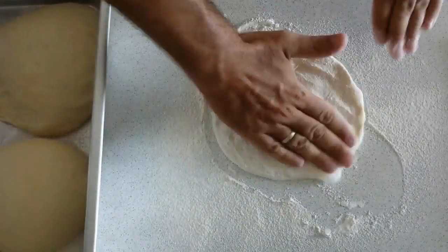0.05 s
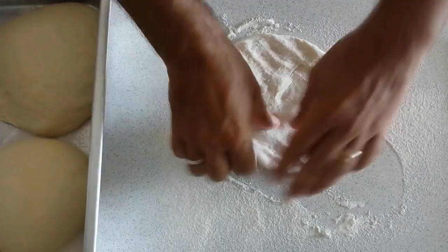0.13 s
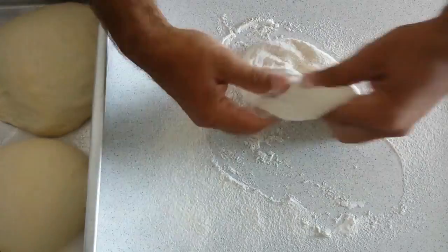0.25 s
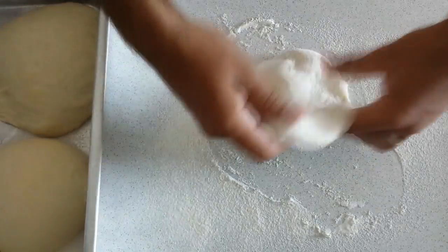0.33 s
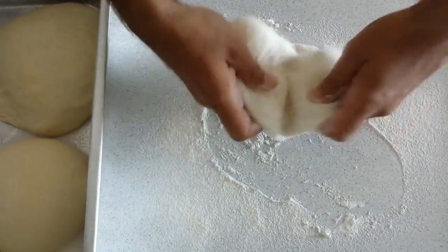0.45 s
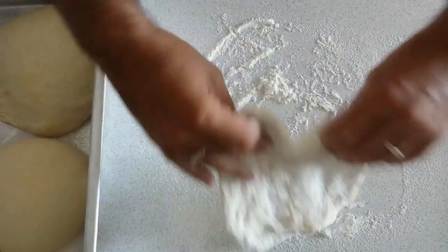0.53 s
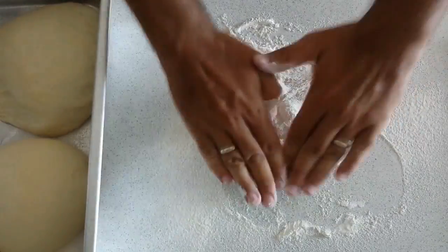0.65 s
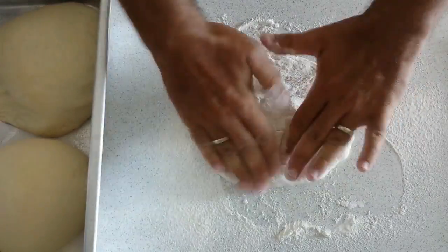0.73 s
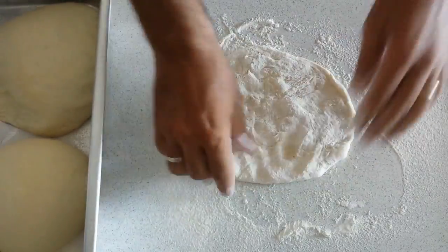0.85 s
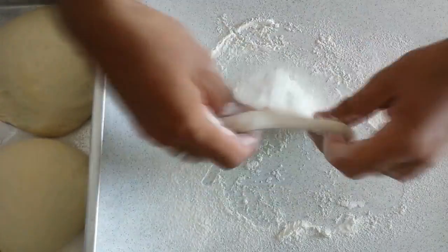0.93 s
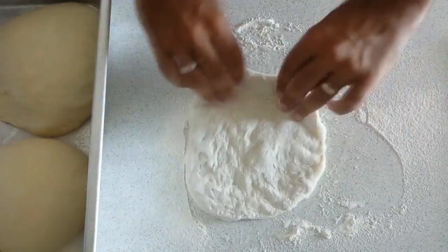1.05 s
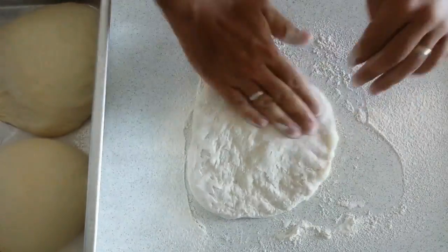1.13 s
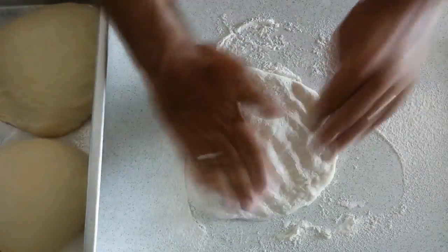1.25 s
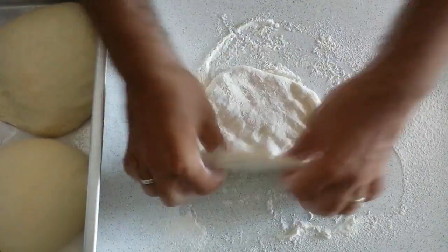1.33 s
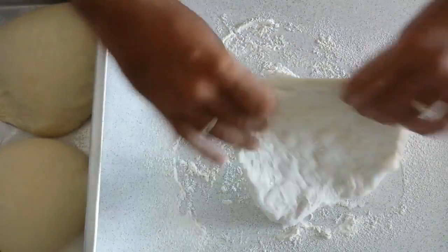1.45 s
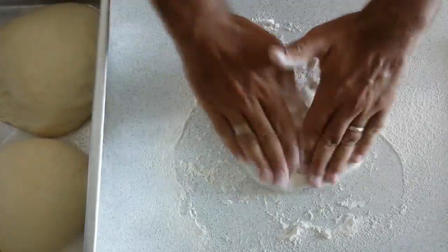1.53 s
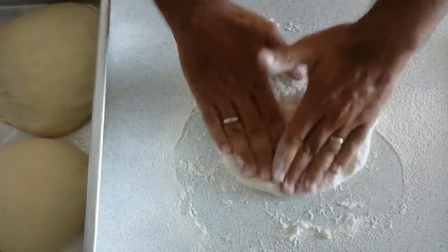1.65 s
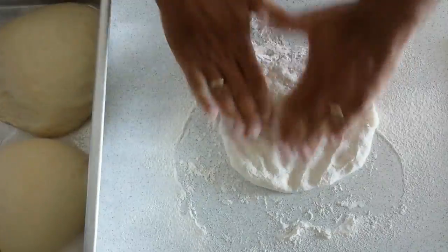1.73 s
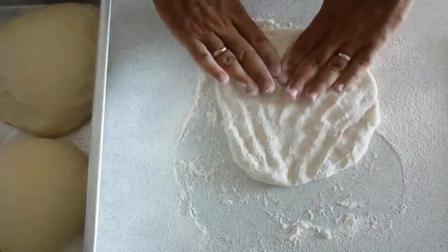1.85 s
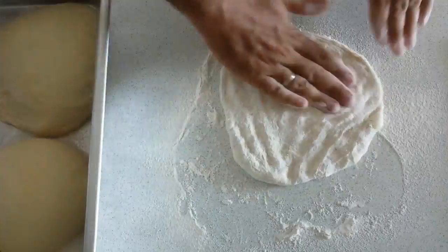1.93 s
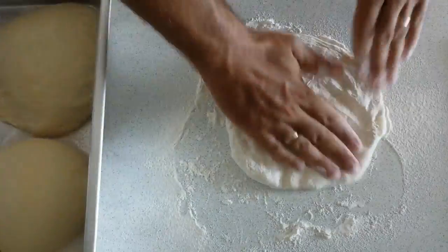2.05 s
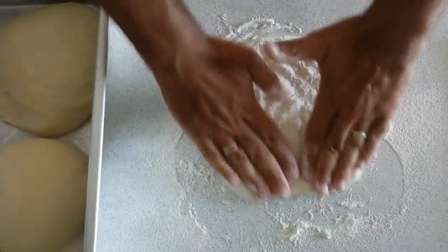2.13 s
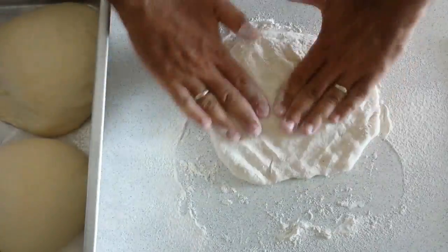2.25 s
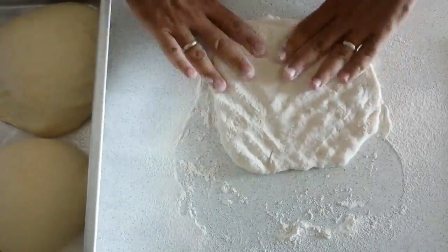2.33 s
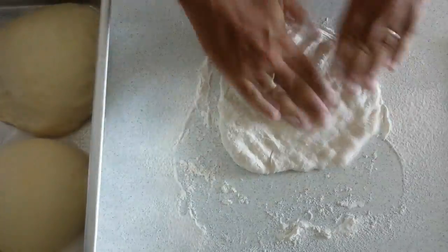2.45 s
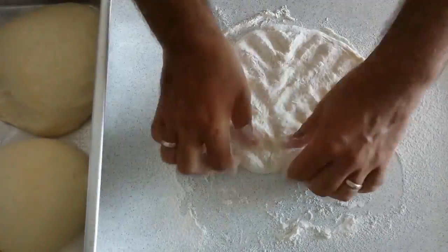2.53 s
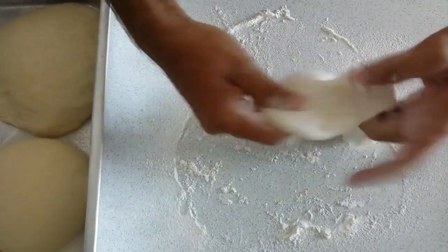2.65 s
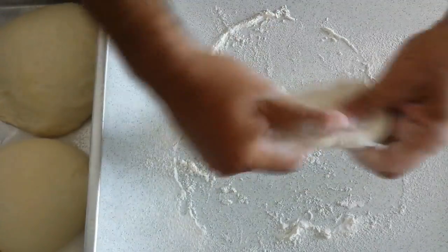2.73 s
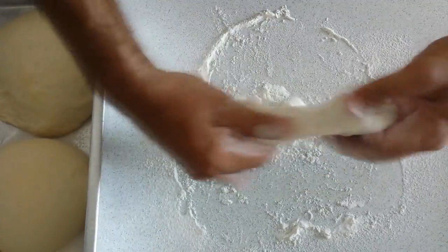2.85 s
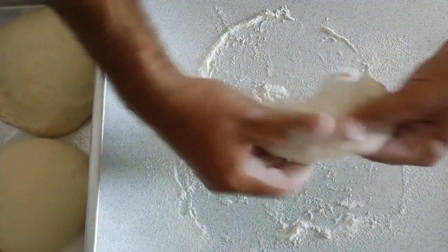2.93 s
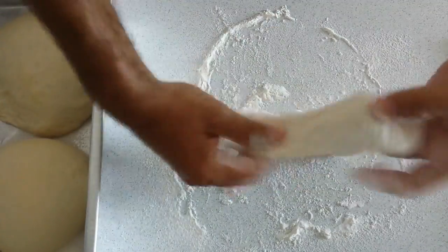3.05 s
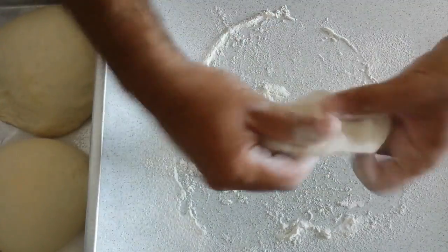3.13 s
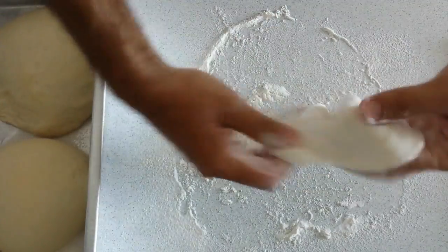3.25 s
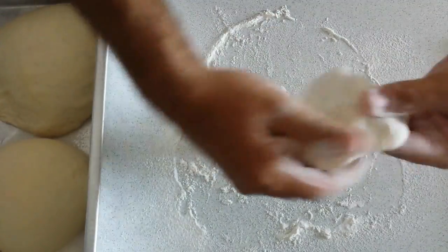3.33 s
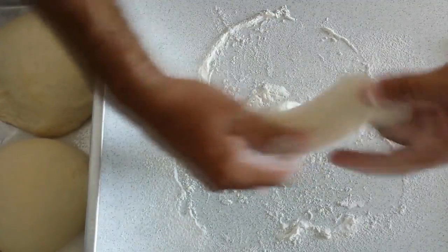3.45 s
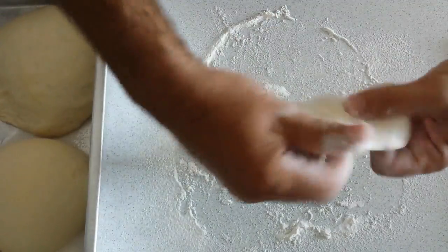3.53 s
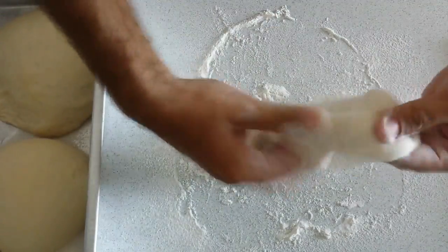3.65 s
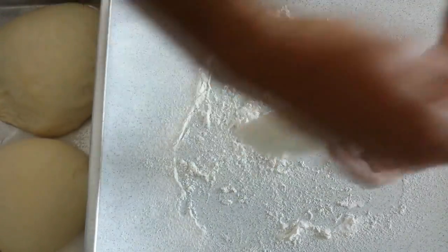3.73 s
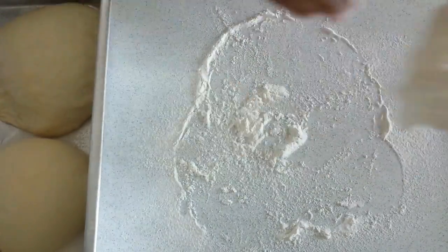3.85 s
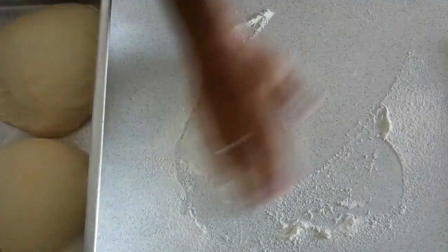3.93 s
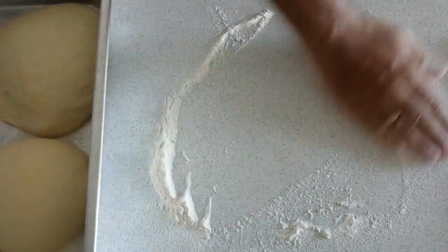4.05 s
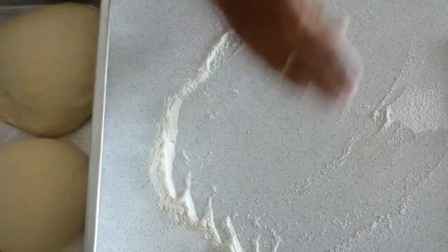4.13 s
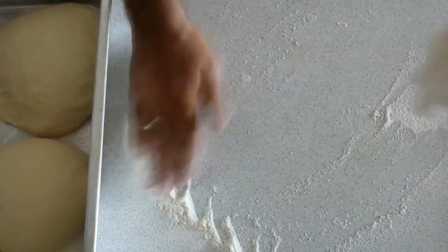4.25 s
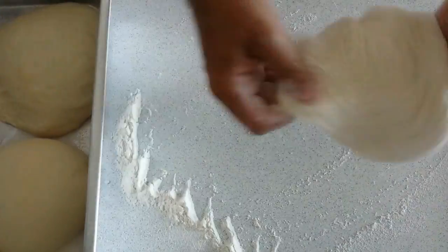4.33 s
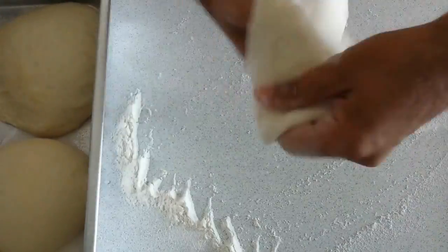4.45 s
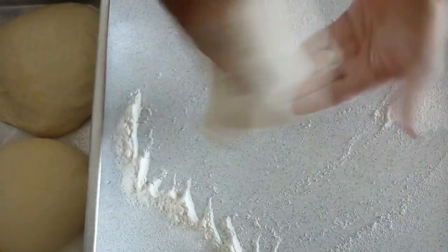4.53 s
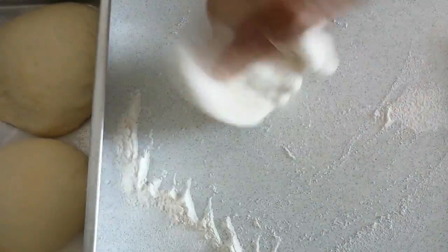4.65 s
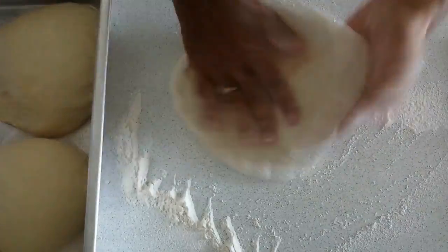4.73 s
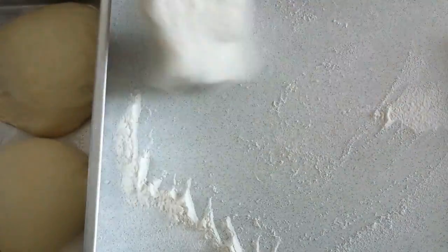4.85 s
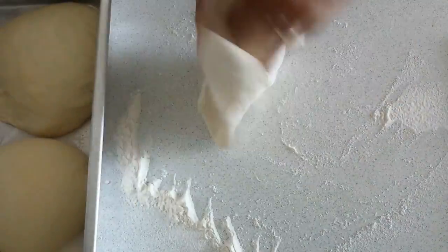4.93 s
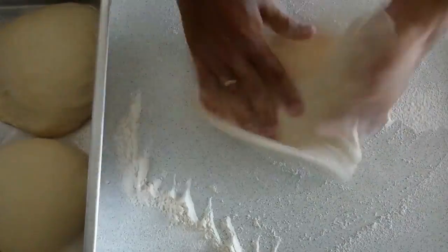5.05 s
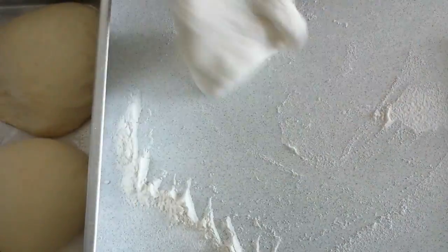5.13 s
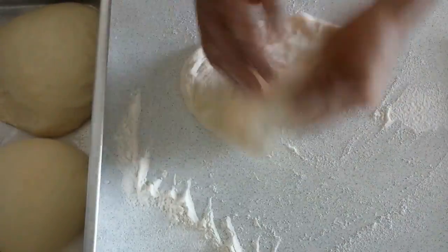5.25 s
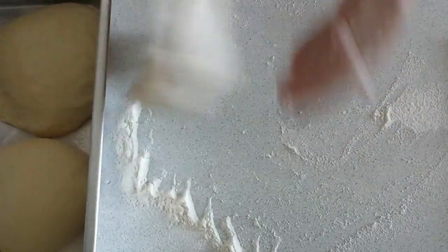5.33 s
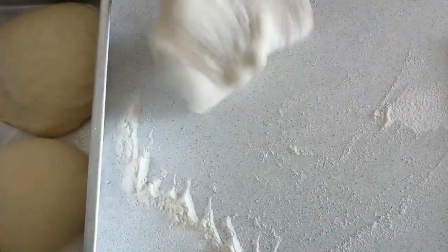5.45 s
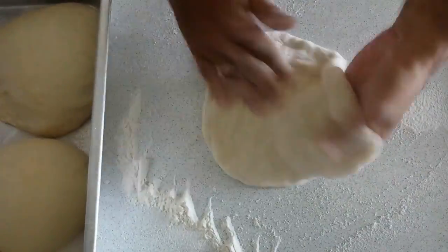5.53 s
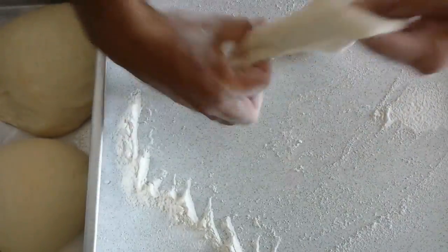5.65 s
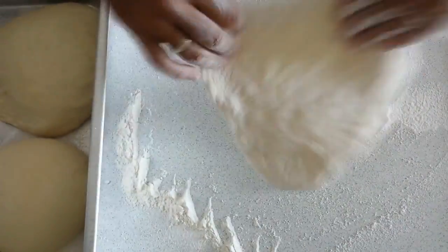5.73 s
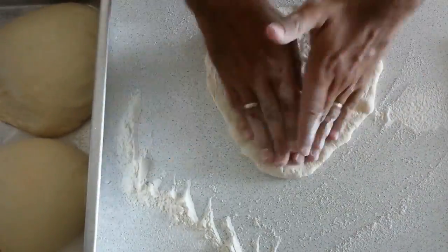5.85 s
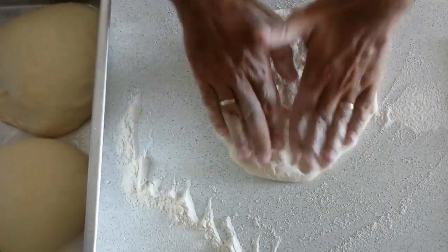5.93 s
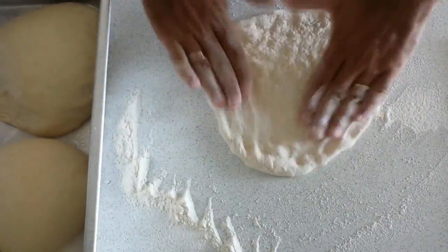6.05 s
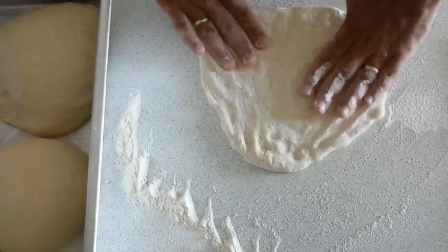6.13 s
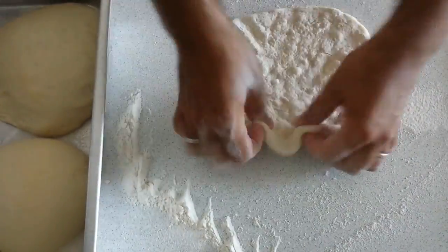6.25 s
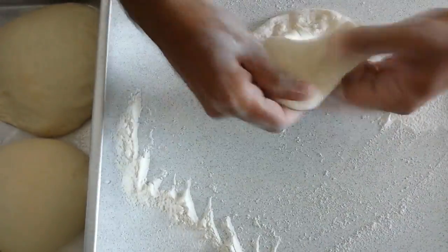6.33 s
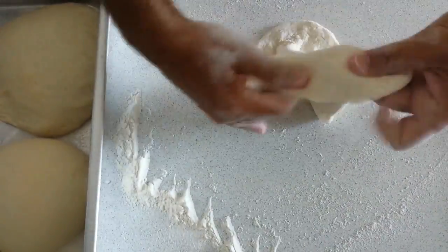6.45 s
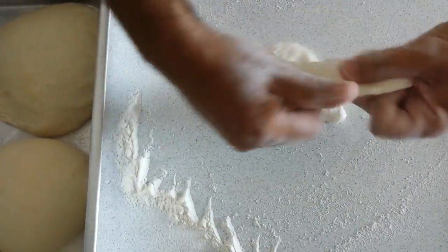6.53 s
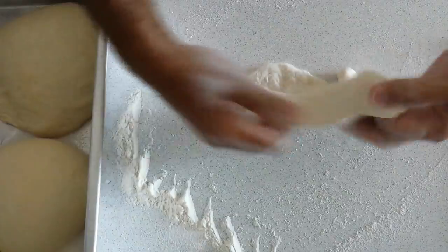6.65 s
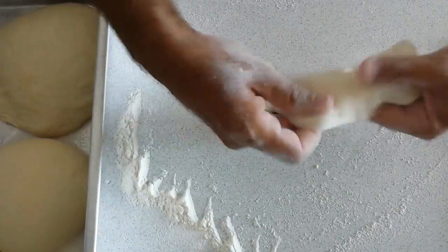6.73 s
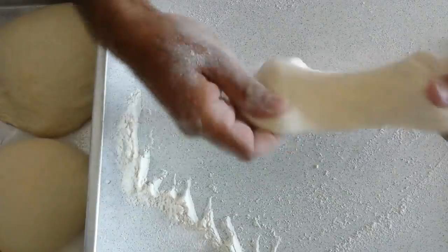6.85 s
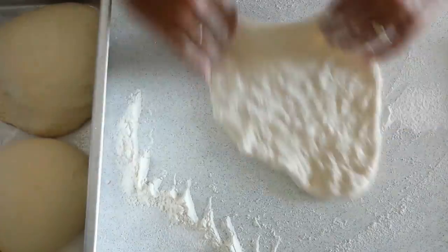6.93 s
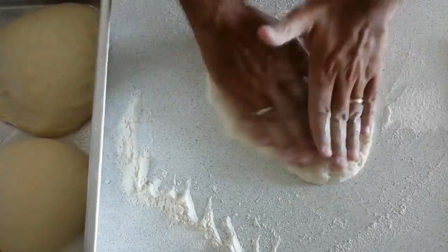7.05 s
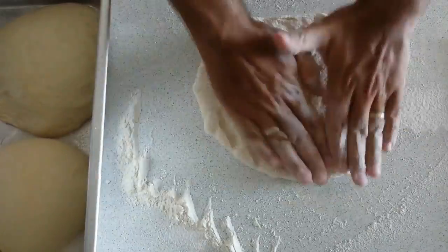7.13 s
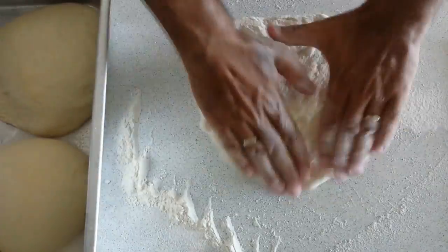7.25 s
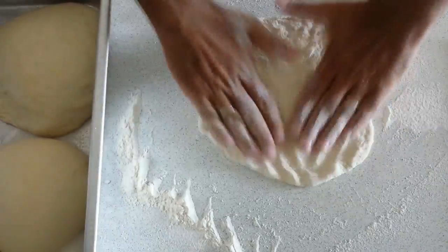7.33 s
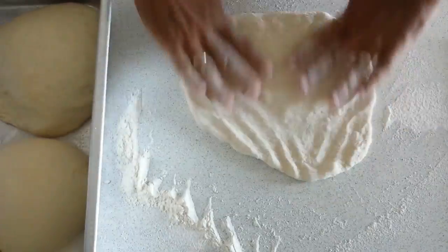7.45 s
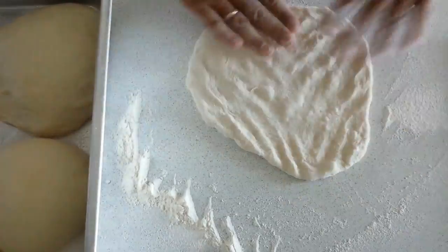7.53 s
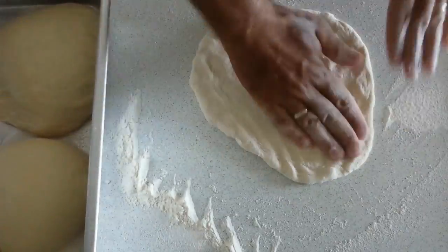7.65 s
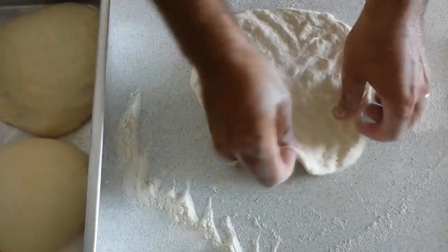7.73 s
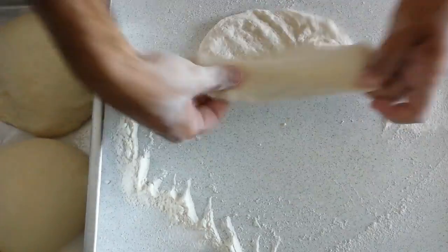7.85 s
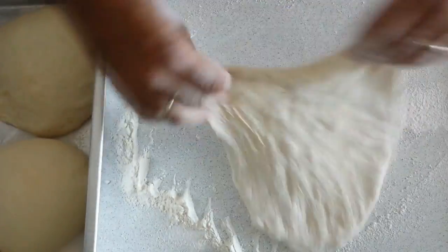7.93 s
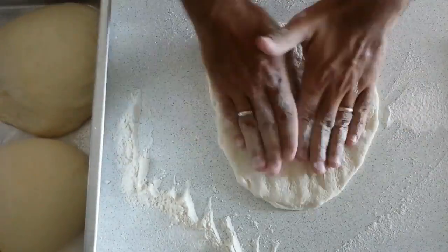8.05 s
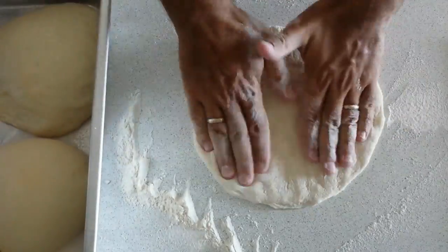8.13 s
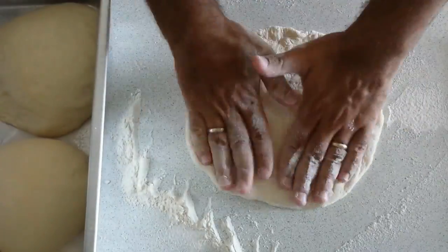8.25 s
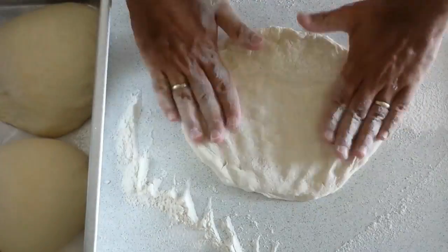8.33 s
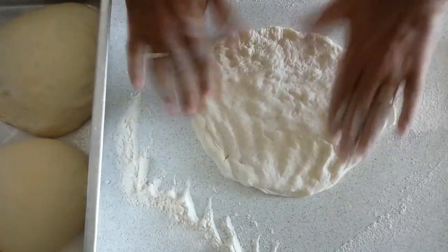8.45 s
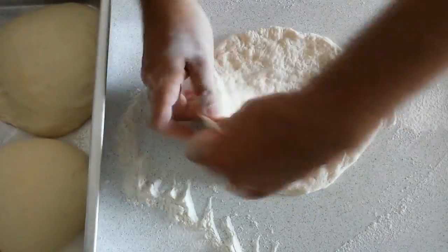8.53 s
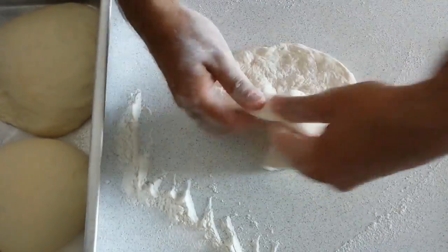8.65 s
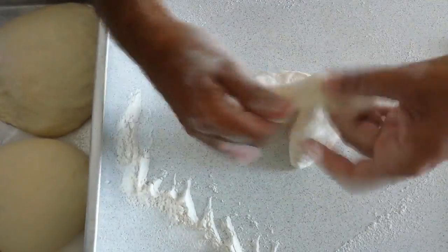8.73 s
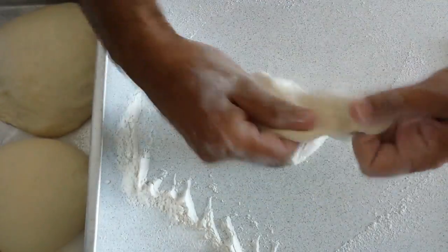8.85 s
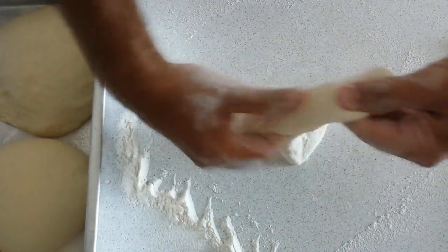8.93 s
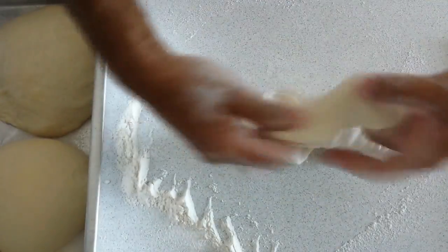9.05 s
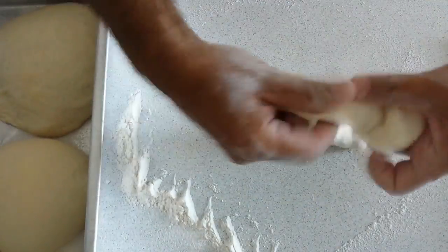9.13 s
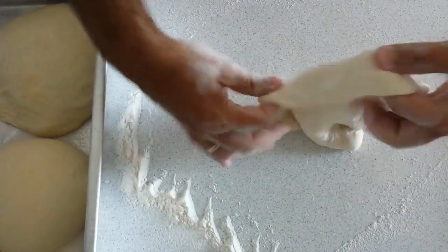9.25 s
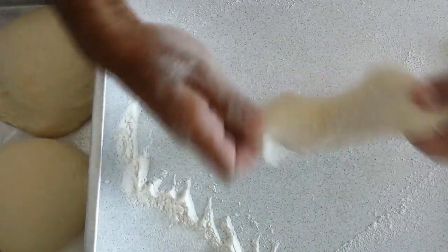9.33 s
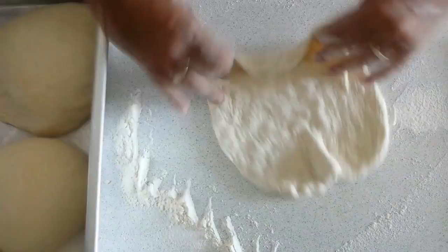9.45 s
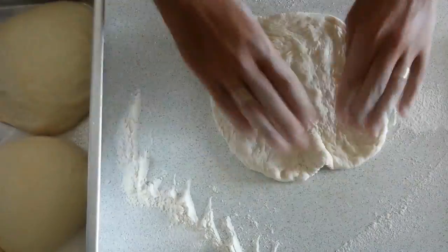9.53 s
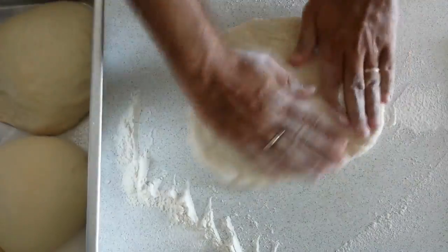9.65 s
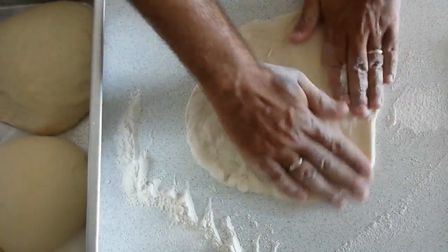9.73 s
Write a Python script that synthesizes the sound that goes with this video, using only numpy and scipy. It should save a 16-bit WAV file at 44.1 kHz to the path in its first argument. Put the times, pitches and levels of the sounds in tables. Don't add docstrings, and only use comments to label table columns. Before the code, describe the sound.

Close stereo sound of hands shaping dough on a floured worktop. Quiet pats, gritty brushing and low knocks come first, then soft rhythmic pinching. The dough is slapped down repeatedly, loud and fleshy with trapped air popping. Afterwards come pinches, a cluster of heavy presses, light rubbing and a last smack, over low counter rumble and steady faint room hiss.

```python
import sys
import numpy as np
from scipy import signal
from scipy.fft import rfft, irfft, next_fast_len
from scipy.io import wavfile
from scipy.ndimage import uniform_filter1d, map_coordinates

SR = 44100
rng = np.random.default_rng(int(sys.argv[2]) if len(sys.argv) > 2 else 0)


def store_pcm(level_fs):
    pcm = np.round(np.clip(level_fs, -1, 1) * 32767).astype(np.int16)
    wavfile.write(sys.argv[1], SR, np.atleast_2d(pcm).T)


def how_loud(loudness_db):
    steps = np.asarray(loudness_db, float) / 20
    return 10 ** steps


N = 431738


def unit(x):
    return x / np.sqrt(np.mean(x ** 2) + 1e-20)


def along(points, hz):
    f, v = np.transpose(points)
    return np.interp(np.log(hz + 1), np.log(f + 1), v)


def over_time(points):
    return np.interp(np.arange(N) / SR, *np.transpose(points))


def wobble(rate):
    knots = rng.standard_normal(int(N * rate / SR) + 4)
    return map_coordinates(knots, [np.arange(N) * rate / SR])


def filtered(x, response):
    m = next_fast_len(N + 8192)
    return irfft(rfft(x, m) * response(np.fft.rfftfreq(m, 1 / SR)), m)[..., :N]


# peak in seconds, level in dB, fall in ms, body in dB.
SMACKS = [(0.319, -52, 4.2, 1), (0.739, -49.5, 8.3, -17), (0.9, -55, 2.1, 4), (1.176, -55, 12, -1.5),
          (2.553, -65.5, 3.5, 16.5), (4.068, -47.5, 6, 4), (4.113, -46, 7.1, 13), (4.124, -40, 1.7, 12),
          (4.45, -70, 2.7, 13), (4.744, -40, 1.8, 8.5), (4.756, -39.5, 3.8, 10), (4.874, -45, 6.6, 6.5),
          (4.919, -33.5, 4.3, 7.5), (5.059, -31, 5.9, 4.5), (5.221, -27.5, 5.1, 7), (5.381, -34, 7.5, 7),
          (5.537, -26, 5.7, 8.5), (5.704, -31, 4.3, 3.5), (5.926, -33, 4.3, 3), (6.395, -49.5, 6.7, 5.5),
          (6.421, -50.5, 3.9, 6.5), (7.1, -39.5, 3.5, 8.5), (7.674, -46, 1.5, 3.5), (7.779, -50, 8.6, 2.5),
          (7.913, -58.5, 3, 11), (9.608, -32.5, 1.6, 11), (9.617, -39.5, 5.1, 1), (9.701, -61, 2.5, 7.5)]
# peak in seconds, level in dB, fall in ms, body in dB.
PATS = [(0.052, -54.5, 4.2, -15), (0.224, -56, 6.2, -11), (1.045, -54.5, 4.5, -1), (1.106, -56, 4.7, -9),
        (1.369, -56.5, 4.7, -3), (1.422, -50, 1.8, -3), (1.559, -52, 2.7, -14), (1.819, -49.5, 1.7, -13),
        (1.911, -54.5, 17, -31), (1.974, -55.5, 18, -3), (2.137, -54.5, 4, -9), (2.612, -56, 3, -1),
        (2.79, -55, 27, -10), (2.934, -54, 2.5, -3), (6.19, -50.5, 3.3, -26), (6.23, -52.5, 3.9, -57),
        (6.285, -53.5, 6.6, 4), (7.563, -47, 11, -19), (7.618, -42.5, 5.3, -17), (7.808, -50, 4.8, -2),
        (8.393, -54.5, 4.4, -15), (8.474, -51, 3.3, -22), (8.492, -49.5, 21, -4.5),
        (8.543, -49.7, 19, -2.5), (8.784, -50.5, 15, -26), (0.565, -58, 8, -10), (8.691, -59, 4, 8),
        (8.885, -52.5, 13, -12), (9.45, -52, 8, -14), (7.345, -56, 6.7, -13)]
# start in seconds, length in ms, level in dB, body in dB.
WIPES = [(1.632, 14, -55.5, -22), (2.387, 13, -50, -8), (2.44, 24, -56, -25), (2.49, 9.2, -57, -30),
         (4.081, 43, -42, 1), (4.236, 27.3, -44.5, -6.5), (4.38, 28, -43.5, -14), (4.49, 27, -56, -1),
         (4.645, 35, -50.5, -12), (4.815, 28, -53.5, -2), (5.6, 17, -51, 4), (7.115, 25, -49.5, -4.5),
         (7.222, 27, -54.5, -4.5), (7.507, 12, -51, -7), (7.72, 15, -58.5, 3), (8.034, 31, -55, -22),
         (8.124, 16.6, -48.5, -2.5), (8.96, 15, -52.5, -14), (9.63, 24, -52, -1.5), (9.747, 14, -50.5, -7)]
# start in seconds, peak in dB.
BRUSHES = [(0.1494, -51), (0.2628, -53), (0.386, -51), (0.6994, -49), (0.8494, -51), (1.3992, -47),
           (1.4794, -49), (1.5094, -48), (1.7185, -52), (1.8412, -49), (2.0278, -49), (2.158, -47),
           (2.1994, -50), (2.2994, -48), (2.3361, -50), (2.5885, -47), (2.6374, -49), (3.1594, -46),
           (3.2939, -44), (3.4594, -46), (3.8147, -45), (3.9494, -45), (4.4483, -52), (4.6349, -39),
           (4.8015, -41), (4.9821, -38), (5.1544, -41), (5.7694, -43), (6.0392, -46), (6.1144, -48),
           (6.1564, -45), (6.5544, -44), (6.7645, -44), (7.4544, -48), (7.6994, -45), (8.2494, -51),
           (8.306, -53), (8.4287, -48), (9.0444, -47), (9.2244, -44), (9.3332, -40), (9.4694, -49)]
# first and last pinch in seconds, middle level in dB.
RUNS = [
    (3.002, 3.4, -46.5),
    (3.525, 3.672, -49.5),
    (6.604, 6.932, -45),
    (9.124, 9.408, -47.5),
]


def touches():
    rows = [(s, db, 2.4 + 0.47 * fall, 0, fall, body) for s, db, fall, body in SMACKS]
    rows += [(s, db, 4.6, 0, fall, body) for s, db, fall, body in PATS]
    rows += [(s, db, 3.9 + 0.35 * hold, hold, 5, body) for s, hold, db, body in WIPES]
    rows += [(s + .005, db - 9.5, 5, 0, 5, -8) for s, db in BRUSHES]
    pinch_gap_s, ends_db, scatter_db = .067, -1, .5
    for first, last, db in RUNS:
        place = np.linspace(-1, 1, round((last - first) / pinch_gap_s) + 1)
        levels = db + ends_db * place ** 2 + scatter_db * rng.standard_normal(len(place))
        times = first + (last - first) * (place + 1) / 2
        rows += [(s, level, 8.5, 0, 6.1, -12.5) for s, level in zip(times, levels)]
    return rows


def contacts():
    power = np.zeros((3, N + 2 * SR))
    t = np.arange(-SR // 14, SR // 7) / SR
    linger = np.array([[1], [1.5], [.9]])
    for s, db, rise_ms, hold_ms, fall_ms, body_db in touches():
        air_db = -7 - 0.23 * body_db
        before = np.minimum(t, 0)
        after = np.maximum(t - hold_ms / 1000, 0)
        swell = how_loud(-6 * (before * 1000 / max(rise_ms, .3)) ** 2)
        lead_in = how_loud(-45.0 + 60 * before / 0.15)
        fall = how_loud(-6 * after * 1000 / (linger * max(fall_ms, 1)))
        tail = how_loud(-23.5 - 60 * after / (0.044 * linger)) * (t > 0)
        level = how_loud(db + np.array([[0], [body_db - 0.4], [air_db]]))
        start = SR + round((s + t[0]) * SR)
        power[:, start:start + len(t)] += (level * (swell + lead_in) * (fall + tail)) ** 2
    return power[:, SR:SR + N]


# time in seconds, level in dB.
WEIGHT = [(0, -60.5), (0.33, -53), (0.52, -58), (1.36, -49.5), (1.88, -53.5), (2.4, -49.5), (3.4, -57),
          (3.98, -55), (4.44, -54.5), (5.7, -40), (5.94, -37), (6.08, -41), (6.54, -52), (6.92, -47),
          (7.06, -58), (7.33, -53.5), (8.59, -54), (9.79, -54.5)]


def weight():
    return over_time(WEIGHT)


# time in seconds, level in dB.
RUB = [(0, -64), (0.8, -65.5), (1.92, -62), (2.72, -62), (2.79, -57), (3.97, -57.5), (4.03, -69),
       (4.44, -61.5), (4.95, -51.5), (5.73, -53), (6, -58.5), (6.4, -60.5), (6.62, -51), (7.04, -60),
       (8.65, -63.5), (8.78, -58), (9.36, -58), (9.79, -59.5)]
# middle in seconds, half-length in ms, level change
# in dB.
LIFTS = [(0.81, 29, -8), (0.98, 50, -9), (1.26, 80, -3.5), (1.69, 330, -1), (4.19, 35, 3), (4.315, 21, -7),
         (4.72, 54, -6), (5.35, 51, -8), (5.66, 23, -7), (7.04, 54, -6), (3.56, 44, -4.5), (7.18, 81, -6),
         (7.86, 20, -3.5), (8, 40, -7), (8.65, 21, -8), (9.56, 41, -8.5), (9.71, 53, -11), (2.955, 15, -5),
         (3.851, 25, -4), (4.79, 15, -6), (5.189, 25, -5), (5.985, 35, -4), (8.103, 15, -5)]
# frequency in Hz, level in dB per Hz.
FLOUR = [(650, -32), (1100, -12.5), (1680, 2), (1870, 1.5), (2790, 0.5), (3550, 3), (4260, 0.5),
         (5110, 3.5), (8000, -10), (10400, -22), (17600, -120)]
# frequency in Hz, level in dB per Hz.
DOUGH = [(200, -18), (320, -4), (390, -3), (530, -11), (800, -5), (1900, -12.5), (2700, -18), (4200, -25),
         (7000, -120)]
# frequency in Hz, level in dB per Hz.
AIR = [(3530, -46), (6000, -6.5), (6440, -2), (7680, -4), (15300, -6.5)]


def hands(drift):
    now = np.arange(N) / SR
    weight_db = weight()
    fidget = 1.4 * np.maximum(wobble(36), -.9)
    lifted = sum(db * np.maximum(1 - abs(now - s) * 1000 / ms, 0) for s, ms, db in LIFTS)
    rub_db = over_time(RUB) + lifted
    body_db = -60.5 + 0.42 * (weight_db - weight_db.mean())
    body_db += 0.61 * (rub_db - rub_db.mean())
    grit = unit(how_loud(1.9 * wobble(500)))
    rub, body, air = contacts()
    rub = np.sqrt(rub + how_loud(rub_db + fidget - 0.5) ** 2)
    body = np.sqrt(body + how_loud(body_db + fidget) ** 2)
    air = np.sqrt(air + how_loud(rub_db + fidget - 2.5) ** 2)
    return grit * (rub * rush(FLOUR, drift) + body * rush(DOUGH, drift) + air * rush(AIR, drift))


# start in seconds, level in dB, counter pitch in Hz, knock in dB.
PRESSES = [(0.232, -40.5, 129, -21), (1.043, -42.5, 135, -6), (1.253, -48.5, 121, 0),
           (1.367, -27.5, 136, -14.5), (1.419, -38, 131, -21), (1.496, -33, 149, -7.5),
           (1.629, -39.5, 137, -16), (1.813, -42.5, 139, -5), (2.045, -40.5, 148, -5),
           (2.102, -34.5, 134, -6), (2.358, -48, 118, -13), (2.448, -35.5, 136, -13),
           (2.551, -41, 142, -0.5), (2.607, -31.5, 122, -7), (2.703, -37, 141, -7), (5.988, -47, 148, -17),
           (6.096, -41, 160, -61), (6.282, -39, 144, -40), (6.379, -36, 148, -5), (6.662, -48, 154, -9),
           (6.863, -41.5, 140, 5.5), (7.446, -34, 137, -10), (7.574, -41.5, 120, -3),
           (7.675, -34, 131, -13), (7.72, -22, 122, -11), (7.776, -18, 153, -29), (7.803, -26, 128, -13),
           (7.899, -44.5, 148, 3), (8.502, -25.5, 123, -13), (8.541, -33, 129, -13)]
# start in seconds, level in dB, counter pitch in Hz, knock in dB,
# left lead in radians.
LANDINGS = [(0.308, -46, 149, -2, 1.7), (0.897, -36, 121, -12, 1.9), (4.743, -34, 125, -4, 2.9),
            (4.879, -37, 160, 3, .2), (4.916, -24, 130, -16, 3), (5.056, -16, 133, -9, -1.3),
            (5.217, -26, 150, -2, 1.7), (5.378, -19, 123, -4, -2.6), (5.539, -14.5, 131, -9, -.4),
            (5.701, -25, 137, -8, 2.5), (5.924, -30, 123, -12, .8), (7.094, -33, 133, -18, 2.8),
            (9.606, -20, 132, -16, 1.6)]
# frequency in Hz, level in dB, 60 dB decay in seconds.
KNOCK = [(241, 5, 0.072), (385, 9.5, 0.037), (698, 6, 0.016), (860, 5, 0.021)]


def thumps():
    out, t = np.zeros((2, N + SR)), np.arange(SR // 8) / SR
    luck = rng.standard_normal((len(PRESSES + LANDINGS), 2 * len(KNOCK) + 4))
    for (s, db, hz, knock_db, *known), draw in zip(PRESSES + LANDINGS, luck):
        lead = known[0] if known else np.sign(draw[-3]) * (1.22 + 0.46 * draw[-4])
        turn = np.array([[lead / 2], [-lead / 2]])
        damping = -60 * t / 0.066 - 60 * (t / 0.3) ** 2
        ring = how_loud(10.5 + damping) * np.sin(2 * np.pi * hz * t + turn)
        sway_hz = 72 * (1 + .18 * np.tanh(draw[-2]))
        sway_level = how_loud(-4.5 + 1.2 * draw[-1] - 60 * t / 0.067)
        ring += sway_level * np.sin(2 * np.pi * sway_hz * t + turn)
        ring *= 1 - np.exp(-t / 0.0025)
        for (mode_hz, mode_db, t60), size, detune in zip(KNOCK, draw, draw[len(KNOCK):]):
            phase = 2 * np.pi * mode_hz * (1 + 0.062 * detune) * t + (2 + size) * turn
            level = how_loud(knock_db + mode_db + 0.5 + 0.37 * size - 60 * t / t60)
            ring += level * np.sin(phase) * (1 - np.exp(-t / 0.0064))
        out[:, round(s * SR):][:, :len(t)] += how_loud(db) * ring
    return out[:, :N]


# time in seconds, peak in dB, pitch in Hz.
SLAPS = [(0.316, -40, 371), (0.317, -38, 721), (0.731, -44, 759), (0.733, -50, 2094), (0.734, -45, 5345),
         (0.899, -43, 780), (0.899, -49, 1157), (1.174, -36, 387), (1.173, -48, 877), (1.814, -47, 1916),
         (1.816, -44, 5227), (4.071, -33, 366), (4.069, -33, 1485), (4.078, -33, 2164), (4.119, -32, 392),
         (4.118, -27, 748), (4.113, -24, 1900), (4.113, -29, 2223), (4.742, -23, 306), (4.743, -28, 990),
         (4.743, -30, 1415), (4.754, -20, 392), (4.752, -25, 823), (4.753, -29, 1065), (4.883, -25, 296),
         (4.887, -36, 915), (4.92, -19, 387), (4.919, -21, 985), (4.922, -27, 1518), (4.914, -28, 2164),
         (5.058, -20, 371), (5.06, -21, 834), (5.058, -23, 1286), (5.065, -29, 1943), (5.229, -17, 382),
         (5.221, -15, 850), (5.219, -16, 1776), (5.217, -23, 3224), (5.22, -25, 5044), (5.379, -25, 613),
         (5.383, -20, 812), (5.376, -28, 1281), (5.377, -27, 1862), (5.54, -14, 392), (5.541, -15, 1092),
         (5.54, -15, 1388), (5.539, -12, 1695), (5.539, -16, 1964), (5.701, -23, 382), (5.704, -26, 1313),
         (5.928, -28, 328), (5.923, -22, 968), (5.923, -25, 2400), (7.097, -32, 538), (7.096, -32, 1545),
         (7.102, -35, 2051), (9.607, -24, 925), (9.607, -22, 1458), (9.607, -30, 1932), (9.606, -19, 2643)]


def slaps():
    out, t = np.zeros((2, N + SR)), np.arange(SR // 14) / SR
    rise_s = .001
    for (s, db, hz), turn in zip(SLAPS, rng.uniform(0, 1, (len(SLAPS), 4))):
        t60_s = .036 * (400 / hz) ** .32
        shape = how_loud(db - 1.2 - 60 * t / t60_s) * (1 - np.exp(-t / rise_s))
        sides = np.array([[0], [0.092 + 0.24 * turn[1]]])
        twin_hz = hz * (1 + .1 * (2 * turn[2] - 1))
        ring = np.sin(2 * np.pi * (hz * t + turn[0] + sides))
        ring += .45 * np.sin(2 * np.pi * (twin_hz * t + turn[3] - sides))
        out[:, round((s - rise_s) * SR):][:, :len(t)] += shape * ring
    return out[:, :N]


# time in seconds, level in dB, counter pitch in Hz, left lead in radians.
NUDGES = [(0.44, -51, 161, -0.6), (0.7, -50, 163, 0.2), (0.76, -48, 117, -1.5), (1.01, -50, 146, 0.9),
          (2.198, -48, 140, 0.2), (2.892, -45, 161, 1.5), (3.026, -51, 151, 2.2), (3.15, -51, 149, -0.4),
          (3.205, -51, 138, 1.2), (3.29, -51, 156, 2.8), (3.429, -51, 149, -1.2), (3.523, -51, 135, 2.2),
          (3.67, -51, 133, -1.7), (3.748, -46, 128, -0.9), (3.891, -49, 130, -2.0), (4.1, -45, 130, -0.4),
          (4.199, -48, 132, 2.1), (4.235, -47, 142, -3.1), (4.375, -47, 123, -1.9), (4.499, -51, 110, -0.7),
          (4.584, -49, 133, -0.4), (4.656, -48, 121, 2.5), (4.979, -46, 145, 3.0), (5.148, -44, 158, 2.2),
          (6.521, -50, 162, 2.6), (6.62, -46, 149, -3.1), (6.722, -47, 141, 0.6), (6.788, -44, 137, 1.0),
          (6.895, -47, 139, 1.6), (7.158, -52, 135, 3.0), (7.261, -50, 155, -0.9), (8.109, -47, 144, 2.1),
          (8.198, -49, 160, -1.3), (8.28, -49, 163, 2.9), (8.433, -49, 138, 2.9), (8.688, -46, 150, 1.4),
          (8.973, -51, 136, 2.5), (9.226, -49, 139, 1.2), (9.348, -52, 152, -0.3), (9.471, -51, 131, -1.4)]


def nudges():
    out, t = np.zeros((2, N + SR)), np.arange(SR // 8) / SR
    rise_s, t60_s = .012, .11
    swell = how_loud(10.5 - 60 * t / t60_s) * (1 - np.exp(-(t / rise_s) ** 2))
    for (s, db, hz, lead), turn in zip(NUDGES, rng.uniform(0, 2 * np.pi, len(NUDGES))):
        ring = np.sin(2 * np.pi * hz * t + turn + np.array([[lead / 2], [-lead / 2]]))
        out[:, round((s - rise_s / 2) * SR):][:, :len(t)] += how_loud(db) * swell * ring
    return out[:, :N]


def squeak():
    start_s, length_s, pitch_hz = 1.985, .11, 3000
    place = np.clip((np.arange(N) / SR - start_s) / length_s, 0, 1)
    tone = np.sin(2 * np.pi * np.cumsum(pitch_hz * (1 + .006 * wobble(40))) / SR)
    return how_loud(-66) * np.sqrt(np.abs(np.sin(np.pi * place))) * tone


# time in seconds, pitch in Hz.
SAG = [(0, 150), (.7, 160), (2.9, 162), (3.7, 130), (4.5, 120), (5.15, 158), (5.75, 166), (5.87, 142),
       (6.02, 165), (6.8, 137), (7.3, 152), (8.15, 158), (9.79, 150)]


def hum():
    pitch_hz = over_time(SAG) * (1 + 0.05 * wobble(11))
    phase = 2 * np.pi * np.cumsum(pitch_hz) / SR
    apart = np.cumsum(14 * wobble(9)) / SR
    return unit(how_loud(4.6 * wobble(20)) * np.sin(phase + np.array([apart, -apart])))


# frequency in Hz, level in dB per Hz.
SHAKE = [(12, -60), (20, -15.5), (75, -10), (107, -9), (129, -19.5), (145, -6.5), (177, -9), (287, -18.5),
         (330, -30.5), (430, -53), (730, -120)]


def counter_shake(drift):
    weight_db = weight()
    rumble_level = how_loud(-1.1 + (0.49 - 1) * (weight_db - weight_db.mean()))
    shaking = rumble_level * rush(SHAKE, drift) + how_loud(-4) * hum()
    return how_loud(weight_db + 0.48 * wobble(22)) * shaking


# frequency in Hz, level in dB per Hz.
HISS = [(120, -27), (200, 6.5), (333, -1), (392, -6), (525, -4), (874, -0.5), (1510, -18), (5110, -22),
        (9140, -22), (14700, -15), (15500, -19)]


def hiss(drift):
    return how_loud(-61 - 3) * rush(HISS, drift)


# frequency in Hz, left-right likeness from 0 to 1.
ALIKE = [(100, 0.83), (500, 0.43), (2000, 0.24), (5000, 0.53), (12000, 0.3)]


def rush(spectrum, drift):
    a, b = signal.stft(rng.standard_normal((2, N)), nperseg=4096, noverlap=3072)[2]
    hz = np.fft.rfftfreq(4096, 1 / SR)[:, None]
    turn = np.arccos(np.clip(along(ALIKE, hz), -1, 1)) / 2
    mid, side = a * np.cos(turn), b * np.sin(turn)
    z = np.array([(mid + side) * drift, (mid - side) * drift.conj()])
    z = z / (abs(z) + 1e-9) ** 0.94
    z = how_loud(along(spectrum, hz)) * z
    return unit(signal.istft(z, nperseg=4096, noverlap=3072)[1][:, :N])


def drifting(step, size):
    kicks = rng.standard_normal((2049, -(-N // 1024) + 1))
    kicks = uniform_filter1d(kicks, size, 0)
    kicks[:28] = 3 * kicks[14]
    kicks = unit(kicks)
    return np.exp(1j * step * (np.cumsum(kicks, 1) + 8 * kicks[:, :1]))


# frequency in Hz, left minus right in dB.
LEAN = [(60, -5), (180, -3.0), (550, -4.5), (1650, -3), (4970, -7.5), (15000, -6)]


def microphone(dry):
    top_hz = 15740
    near = filtered(dry, lambda hz: how_loud(along(LEAN, hz) * [[.5], [-.5]]) * (hz < top_hz))
    return near / (1 + (near / .7) ** 4) ** (1 / 4)


def scene():
    drift = drifting(step=0.2976, size=12)
    close = hands(drift) + thumps() + slaps() + nudges() + squeak()
    return close + counter_shake(drift) + hiss(drift)


def top_cut(x):
    return signal.sosfilt(signal.butter(12, 15780, fs=SR, output="sos"), x)


def record(dry):
    mix = microphone(dry)
    return top_cut(mix)


dry = scene()
out = record(dry)
store_pcm(out)
```